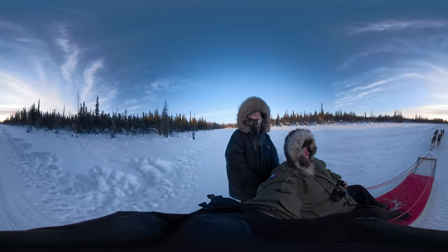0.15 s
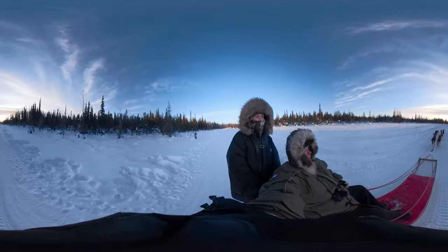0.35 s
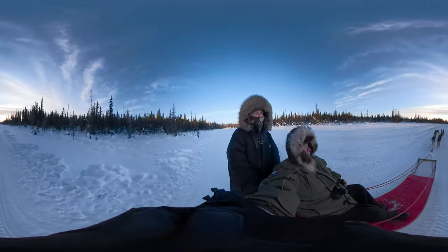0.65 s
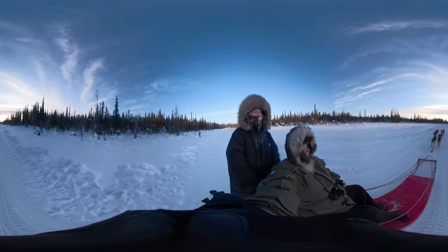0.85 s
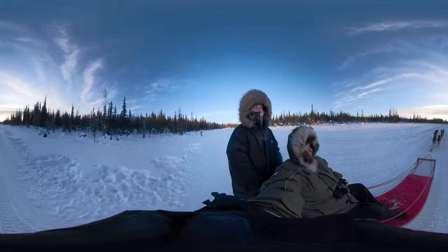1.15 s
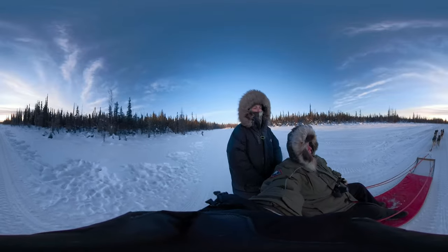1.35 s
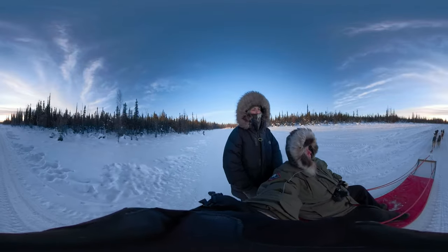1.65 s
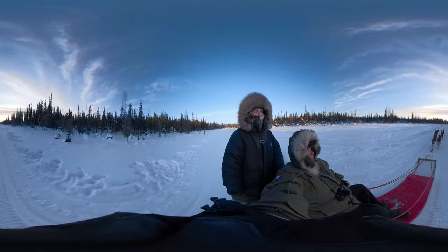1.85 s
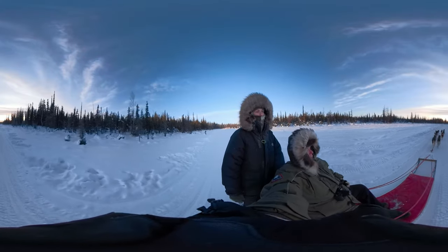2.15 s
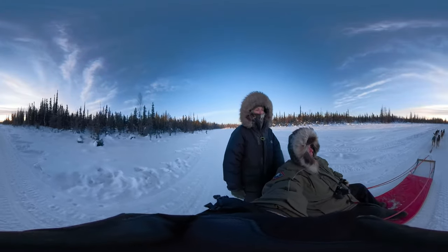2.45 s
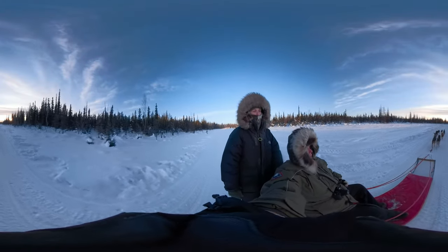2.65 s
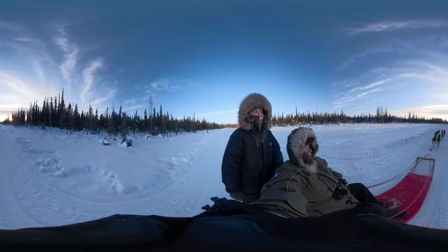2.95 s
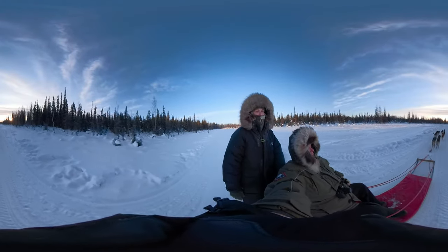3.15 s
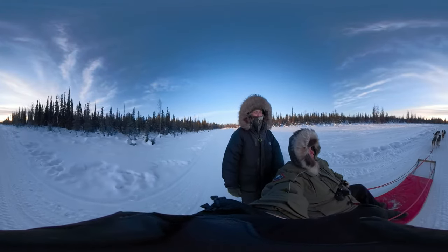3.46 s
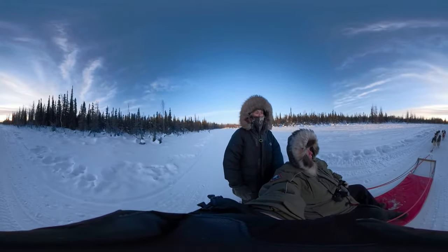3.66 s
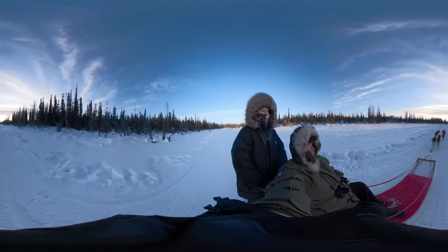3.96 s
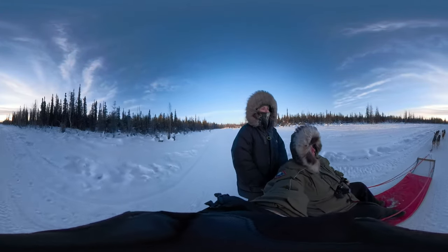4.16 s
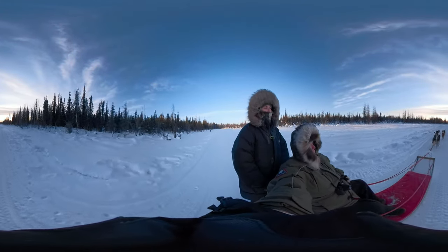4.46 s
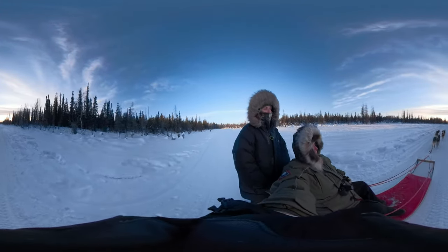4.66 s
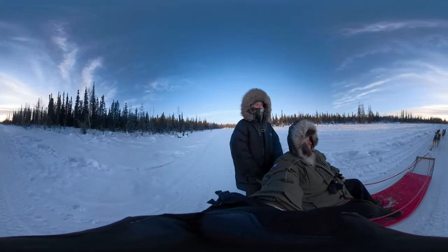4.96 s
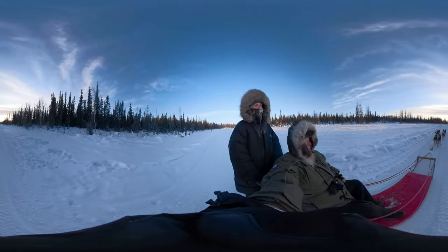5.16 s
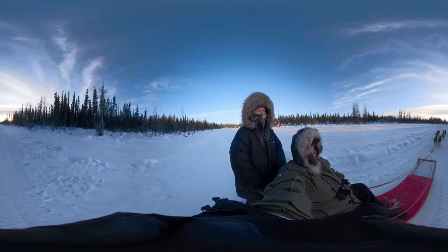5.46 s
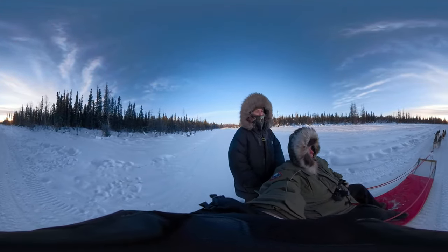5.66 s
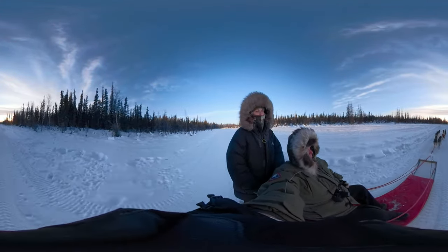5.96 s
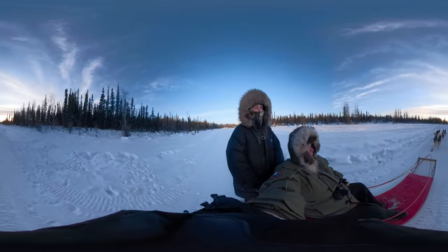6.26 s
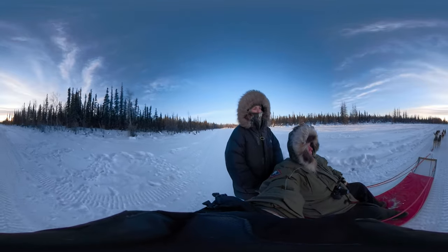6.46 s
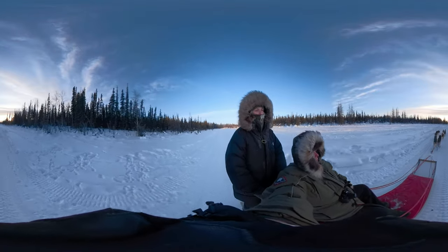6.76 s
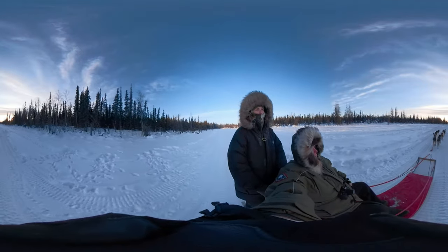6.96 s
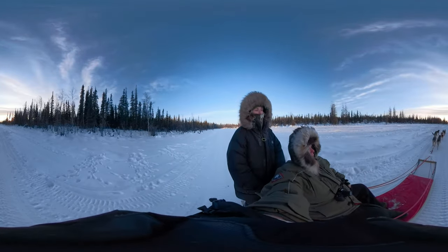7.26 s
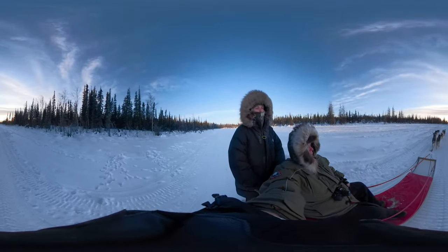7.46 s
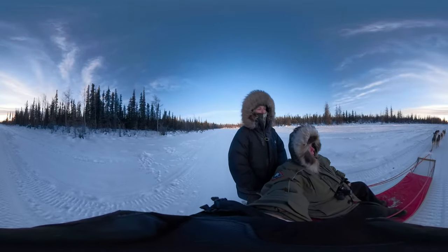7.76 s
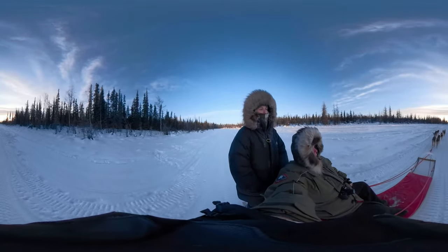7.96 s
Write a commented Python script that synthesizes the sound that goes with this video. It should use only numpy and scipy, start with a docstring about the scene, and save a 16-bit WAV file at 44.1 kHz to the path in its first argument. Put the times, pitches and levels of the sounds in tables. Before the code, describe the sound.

A wooden sled glides over packed snow with a steady low rumble and gritty scrape, jolted by dull hollow knocks, small rattles and icy ticks.

```python
"""Wooden sled on packed snow

A snowy trail, heard close up by the microphone of a small camera fixed to the sled. Uneven ground shakes
the frame's low modes; the runners hiss and crush crystals, noise carried by the wood and by the air.
Bumps slam the bed with damped sines, loose joints tick and rattle as short pings, cold snow squeaks and
powder hisses past. Resonances of the housing and its port colour the treble."""
import sys
import numpy as np
from scipy import signal
from scipy.fft import rfft, irfft, next_fast_len
from scipy.io import wavfile
from scipy.ndimage import uniform_filter1d, map_coordinates

SR = 44100
rng = np.random.default_rng(int(sys.argv[2]) if len(sys.argv) > 2 else 0)


def transcribe(signal):
    """Save signal, clipped to [-1, 1], as a 16-bit WAV file at the path in sys.argv[1]."""
    frames = np.atleast_2d(signal).T
    limited = np.clip(frames, -1, 1)
    pcm = np.round(limited * 32767).astype(np.int16)
    wavfile.write(sys.argv[1], SR, pcm)


N = 357651


def amp(db):
    """dB to gain."""
    return 10 ** (np.asarray(db) / 20)


def unit(x):
    """x at rms 1."""
    return x / np.sqrt(np.mean(x ** 2) + 1e-20)


def noise():
    """White noise over the whole ride."""
    return rng.standard_normal(N)


def wobble(rate):
    """A smooth random curve, rate knots a second."""
    knots = rng.standard_normal(int(N * rate / SR) + 4)
    return map_coordinates(knots, [np.arange(N) * rate / SR])


def curves(rows):
    """One value per sample for each column after the time."""
    s, *columns = np.transpose(rows)
    return [np.interp(np.arange(N) / SR, s, column) for column in columns]


def add(track, s, sound):
    """Mixes sound into track at s seconds."""
    part = track[max(round(s * SR), 0):][:len(sound)]
    part += sound[:len(part)]


def filtered(x, response):
    """x times a complex response of frequency."""
    m = next_fast_len(N + SR // 2)
    return irfft(rfft(x, m) * response(np.fft.rfftfreq(m, 1 / SR)), m)[..., :N]


def mode(f, hz, width):
    """Response of one causal resonance, with gain 1 at its centre hz."""
    return 1j * f * width / (hz * hz - f * f + 1j * f * width)


def coloured(x, points):
    """x through a causal filter with the (Hz, dB) shape and energy 1."""
    f, db = np.transpose(points)
    log_hz = np.log(np.fft.rfftfreq(4096, 1 / SR) + 1)
    gain = np.maximum(amp(np.interp(log_hz, np.log(f + 1), db)), 1e-5)
    # folding the cepstrum onto positive times gives minimum phase
    cepstrum = irfft(np.log(gain))
    cepstrum[1:2048] *= 2
    cepstrum[2049:] = 0
    impulse = irfft(np.exp(rfft(cepstrum)))
    return signal.fftconvolve(x, impulse / np.linalg.norm(impulse))[:N]


def crackle(rate, spread_db, t60):
    """Envelope of rms 1: random short bursts of uneven size, each dying fast (rate per s, t60 in s)."""
    chance, size = rng.random((2, N))
    starts = (chance < rate / SR) * amp(-spread_db * np.log(size + 0.0081))
    t = np.arange(SR // 20) / SR
    burst = amp(-60 * t / t60) * (1 - np.exp(-t / 0.00087))
    return unit(signal.fftconvolve(starts, burst)[:N])


def steadied(x, share):
    """Friction damps wide swings more than small ones: part of the slow level wander is taken out."""
    power = np.abs(uniform_filter1d(x * x, SR // 12))
    return unit(x / (power + 1e-3) ** (share / 2))


def ping(hz, cycles):
    """A small contact: a damped sine with a soft start, peaking after the given cycles."""
    u = np.arange(SR // 40) / SR * hz / cycles
    return u * np.exp(1 - u) * np.sin(2 * np.pi * cycles * u)


# Roughness of the trail under the sled. Each row: time in seconds, then the base levels in dB of
# bed rumble, scrape and snow hiss, which each layer offsets and varies.
RIDE = [(0.0, -26.5, -36, -51.5), (0.92, -30, -40, -57), (1.6, -27, -36.5, -53.5), (2.26, -31, -39.5, -57),
        (2.55, -27, -35.5, -53), (2.78, -22.5, -39, -54.5), (3.21, -27.5, -42.5, -60.5),
        (3.61, -26.5, -37, -52), (3.81, -32, -37, -54), (4.22, -26, -41.5, -57), (4.52, -33, -42.5, -58),
        (4.81, -28, -40, -56.5), (5.1, -34, -44.5, -61), (5.67, -26.5, -40, -54), (6.19, -28.5, -41, -55.5),
        (6.46, -32.5, -42.5, -57), (6.78, -31.5, -41, -55), (7.43, -30.5, -40.5, -56.5),
        (7.72, -35, -44, -58.5), (8.11, -26, -42.5, -58)]
# Runners' bending mode, swelling and fading with the load. Each row: time in seconds, level in dB.
FLEX = [(0.0, -29), (0.09, -26), (0.29, -36.5), (1.35, -28.5), (1.47, -44), (1.67, -23), (1.72, -31),
        (1.92, -25.5), (2.03, -39), (2.33, -28), (2.62, -34.5), (2.78, -21.5), (2.91, -36.5), (3.7, -27),
        (3.86, -38), (4.36, -28), (4.54, -46), (4.95, -28), (5.15, -39), (5.47, -28), (5.99, -31),
        (6.08, -42), (6.28, -27), (6.37, -38.5), (8.09, -34.5), (8.11, -42)]
# Pitch of that bending, before its random drift. Each row: time in seconds, pitch in Hz.
FLEX_PITCH = [(0, 65), (1.2, 67), (2, 66.5), (2.35, 71), (2.7, 68), (3.7, 69), (4.6, 71), (8.11, 71)]
# Low modes of the bed. Each row: centre in Hz, width in Hz, relative level in dB.
BED_MODES = [(94.3, 41.6, -7), (139.9, 31.9, 0.5), (165.2, 38.6, -1.5), (200.9, 50.5, -7.5),
             (260.8, 32, -12), (347, 88, -29)]


def frame():
    """The uneven trail drives the runners' bending, the bed's low modes and a heave of the whole sled."""
    bed_db = curves(RIDE)[0]
    (hz,), (flex_db,) = curves(FLEX_PITCH), curves(FLEX)
    phase = 2 * np.pi * np.cumsum(hz + 1.68 * wobble(9.1)) / SR
    flex = unit(amp(1.9 * wobble(8) + 1.5 * wobble(13)) * np.sin(phase))

    def bed_response(f):
        """The modes in parallel with alternating signs, through one broad resonance."""
        modes = sum((-1) ** k * amp(db) * mode(f, centre, width)
                    for k, (centre, width, db) in enumerate(BED_MODES))
        return modes * mode(f, 149, 390)

    bed = steadied(unit(filtered(noise(), bed_response)), share=0.23)
    lumps = unit(amp(1.64 * wobble(6) + 0.54 * wobble(16)) * bed)
    heave = unit(filtered(noise(), lambda f: mode(f, 38, 47) ** 2))  # the whole sled on the snow
    heave_db = 0.57 * bed_db - 20.5 + 2.5 * wobble(9.8)
    return amp(flex_db) * flex + amp(bed_db + 3.0) * lumps + amp(heave_db) * heave


# Fine powder thrown past the camera. Each row: time in seconds, level in dB before the flicker.
SPRAY = [(0.0, -68), (0.34, -73.5), (0.99, -76), (1.4, -72), (2.21, -74.5), (2.66, -69.5), (3.18, -74.5),
         (3.57, -69.5), (5.28, -78), (5.47, -74), (6.14, -72), (6.57, -77), (6.82, -69.5), (7.52, -72),
         (7.68, -75), (8.11, -77)]


def spray(flicker):
    """Powder hiss excites the port's top resonance."""
    level = amp(curves(SPRAY)[0]) * flicker
    return level * unit(filtered(noise(), lambda f: mode(f, 12040, 2500) ** 2))


# Scrape carried to the microphone by the frame. Each row: frequency in Hz, relative density in dB per Hz.
WOOD = [(180, -27), (300, 2.5), (399, -6), (463, -4.5), (569, -10.5), (792, -12), (908, -15), (1390, -13),
        (2240, -22.5), (4150, -31), (4600, -35), (5980, -51.5), (10100, -120)]
# Hiss through the microphone port. Each row: frequency in Hz, relative density in dB per Hz.
HOUSING = [(2470, -33), (4200, -12.5), (4530, -6), (5370, 4.5), (5690, 3.5), (7270, 0), (8950, -24),
           (9960, -23), (12100, -18.5), (14200, -24.5), (15000, -31)]
# Scuffs, a runner skids over crust. Each row: start in seconds, hiss level in dB, scrape level in dB,
# length in seconds.
SCUFFS = [(0.0, -57, -44, 0.025), (1.944, -58.5, -50, 0.07), (2.536, -56, -42, .05),
          (2.69, -52.5, -41, .04), (3.223, -47.5, -47, .045), (4.335, -59, -46.5, 0.07),
          (4.776, -61, -42, 0.069), (5.55, -58.5, -53, 0.042), (6.753, -54, -45, 0.046)]
CRUNCH_T60_S, CRUNCH_AIR_DB = 0.2, -12.5  # the crunch dies away; its airborne share
TICK_RISE_S, CREST_DB = 0.0013, 9.5  # rise of a tick; peak of its noise over the rms
JAR_DB, JAR_T60_S = -9.5, 0.039  # the jolt that a rattle passes to the runners, relative to the rattle


def contact():
    """White excitation at the runners: one share travels through the wood, one through the air."""
    _, scrape_db, hiss_db = curves(RIDE)
    grit = crackle(rate=120, spread_db=-2.5, t60=0.0093)  # crystals breaking, common to both paths
    surge = wobble(11)
    wood_grain = unit(1 + 0.26 * grit + 0.33 * crackle(rate=60, spread_db=4, t60=0.023))
    air_grain = unit(1 + 0.39 * grit + 0.36 * crackle(rate=110, spread_db=7, t60=0.022))
    wood = amp(scrape_db + 1.3 * surge - 1.9) * wood_grain
    air = amp(hiss_db + 1.64 * surge + 0.17) * air_grain
    ragged = unit(1 + 0.44 * crackle(rate=63, spread_db=6.5, t60=0.02))
    t = np.arange(SR // 4) / SR
    for s, *_, crunch_db in BUMPS:  # the crust gives way in bits under the slam
        puff = amp(crunch_db - 60 * t / CRUNCH_T60_S) * (1 - np.exp(-t / 0.0053))
        puff = puff * np.resize(ragged[round(s * SR):], len(t))
        add(wood, s - 0.004, puff)
        add(air, s - 0.004, amp(CRUNCH_AIR_DB) * puff)
    for s, scuff_hiss_db, scuff_scrape_db, length in SCUFFS:
        skid = np.sin(np.pi * np.clip(t / length, 0, 1))
        skid = skid * np.resize(ragged[round(s * SR):], len(t))
        add(air, s, amp(scuff_hiss_db) * skid)
        add(wood, s, amp(scuff_scrape_db) * skid)
    u = t / TICK_RISE_S
    for s, treble_db, *_ in TICKS:
        add(air, s, amp(treble_db - CREST_DB) * u * np.exp(1 - u))
    for s, db, _ in RATTLES:  # each rattle also jars the runners on the snow
        add(wood, s, amp(db + JAR_DB - 60 * t / JAR_T60_S))
    powder = spray(amp(3.2 * surge) * unit(1 + 0.74 * grit))
    return powder + coloured(wood * noise(), WOOD) + coloured(air * noise(), HOUSING)


# Slats and joints rattling. Each row: start in seconds, level in dB, ring in Hz.
RATTLES = [(0.176, -30, 1430), (0.295, -39, 1220), (0.427, -33, 1420), (0.479, -28.5, 1270),
           (1.3647, -32, 1260), (1.3827, -38, 1200), (1.4402, -35, 1310), (1.6495, -30, 1010),
           (1.7464, -35, 1700), (1.8998, -29.5, 1540), (2.077, -29.5, 1330), (2.5467, -28, 1270),
           (2.5674, -27, 1520), (2.6914, -26.5, 1420), (2.7829, -30.5, 1420), (2.8393, -36, 950),
           (2.8785, -27, 1430), (3.038, -28, 1364), (3.0956, -36, 1700), (3.1124, -27.5, 1420),
           (3.255, -31.5, 1270), (3.647, -35, 1440), (4.0487, -40, 1362), (4.1633, -33, 1680),
           (4.2762, -38, 1310), (4.3356, -29, 950), (4.359, -27, 1220), (4.377, -33, 1070),
           (4.3997, -31, 1140), (4.4807, -35, 1170), (4.6059, -33, 1260), (4.685, -33, 1080),
           (4.7147, -28, 1330), (4.796, -25, 1470), (4.8761, -27.5, 1310), (4.961, -40, 1440),
           (5.004, -34, 1050), (5.1614, -29.5, 1140), (5.2297, -32.5, 1570), (5.3045, -33.5, 1780),
           (5.8381, -34, 1340), (5.9418, -29, 980), (6.052, -31, 1117), (6.062, -29, 1230),
           (6.293, -34, 1080), (6.608, -33, 1210), (6.709, -29.5, 1290), (6.763, -30, 1500),
           (6.811, -36, 1540), (6.874, -43, 1500), (7.2284, -37.5, 1540), (7.2865, -38, 988),
           (7.314, -28.5, 1850), (7.4516, -35, 988), (7.537, -33, 1720), (7.583, -34, 1150),
           (7.6579, -34.5, 1080), (7.842, -37.5, 1500), (7.8773, -41, 1560), (7.9028, -38, 1580),
           (7.9457, -34, 1410), (8.042, -36, 1160)]
# Brittle ticks of ice crust and fittings. Each row: start in seconds, treble noise peak in dB,
# body level in dB, snap level in dB.
TICKS = [(0.4063, -42, -41, -70), (0.4403, -40, -49, -65), (0.4787, -33, -47, -57), (0.507, -25, -52, -51),
         (0.7022, -41, -54, -69), (0.7343, -36, -49, -69), (0.7475, -30.5, -46, -65),
         (1.2162, -40.5, -53, -63), (1.648, -33, -35, -60), (2.0846, -37, -51, -68),
         (2.2554, -36, -47, -61), (2.28, -37.5, -48, -61), (2.8773, -35.5, -54, -65),
         (3.047, -34.5, -47, -64), (3.066, -38, -39, -65), (3.093, -39, -41, -61), (3.1102, -34, -38, -63),
         (3.3003, -45, -52, -69), (3.3788, -36, -44, -65), (3.515, -38, -54, -57), (3.654, -39, -50, -55),
         (4.0197, -38, -48, -65), (4.0321, -37, -52, -61), (4.0459, -32.5, -39, -58),
         (4.0662, -25.5, -39, -52), (4.0818, -27.5, -43, -57), (4.4159, -38, -53, -64),
         (4.519, -39, -53, -72), (4.6496, -34.5, -41, -65), (4.6851, -39, -42, -61),
         (4.7146, -33, -34, -58), (4.7335, -29.5, -41, -56), (4.7945, -32.5, -36, -63),
         (5.16, -33.5, -37, -48), (5.942, -38, -44, -63), (6.025, -41, -53, -62), (6.0453, -36, -42, -60),
         (6.06, -29, -38, -53), (6.095, -22.5, -42, -48), (6.2027, -35, -40, -66), (6.488, -38, -52, -71),
         (6.6378, -32, -37, -60), (6.7072, -24.5, -33, -36), (7.314, -37.5, -52, -65),
         (7.842, -37, -53, -52), (7.9456, -41, -41, -74)]
# Short squeaks of cold snow. Each row: start in seconds, level in dB, pitch in Hz, cycles to the peak.
SQUEAKS = [(0.304, -43, 1250, 4.3), (.405, -44, 4850, 12), (.408, -48, 3850, 7), (.427, -45, 2980, 9),
           (.427, -40, 1390, 5.8), (.439, -43, 5180, 14), (.456, -48, 4660, 10)]


def joints():
    """Rattles, ticks and squeaks ring briefly; many random pings follow the roughness of the trail."""
    out = np.zeros(N)
    for s, db, hz in RATTLES:
        lower = ping(hz * rng.uniform(0.47, 0.6), cycles=0.37)
        add(out, s, amp(db) * (ping(hz, cycles=0.75) + 0.7 * lower))
    for s, _, body_db, snap_db in TICKS:
        add(out, s, amp(body_db) * ping(rng.uniform(2500, 3900), cycles=1.4))
        add(out, s, amp(snap_db) * ping(rng.uniform(11000, 13500), cycles=3.5))
    for s, db, hz, cycles in SQUEAKS:
        add(out, s, amp(db) * ping(hz, cycles))
    scrape_db = curves(RIDE)[1]
    for when, pitch, life, size in rng.random((2600, 4)):
        hz = 500 * (2300 / 500) ** pitch
        grain = ping(hz, cycles=0.65 + 4.0 * life ** 5)  # most crack, a few squeak
        grain_db = scrape_db[int(when * N)] - 10.0 - 2.05 * np.log(size + 0.025)
        add(out, when * N / SR, amp(grain_db) * grain)
    return out


# Bumps under the bed. Each row: time in seconds, slam level in dB, slam pitch in Hz,
# swing time in milliseconds, sway level in dB, crunch level in dB.
BUMPS = [(0.151, -16.5, 181, 5.7, -51, -53), (0.485, -5.5, 124, 7.5, -19, -34),
         (1.65, -8, 117, 8.1, -26, -42), (2.074, -16, 129, 7, -28, -54), (2.283, -13, 84.5, 9.8, -20, -32),
         (2.62, -9, 113.4, 19, -36, -65), (2.743, -9.5, 185, 11.6, -35, -66),
         (2.881, -10.5, 146.5, 8.9, -49, -55), (2.97, -13, 175, 8, -45, -68),
         (3.381, -14, 119, 7.5, -22, -50), (3.523, -16, 129, 8.6, -42, -56),
         (3.834, -13.5, 165, 9.4, -30, -59), (4.049, -1.5, 129.7, 7.1, -32, -27),
         (4.434, -14.5, 143.3, 18.5, -44, -40), (4.718, -3.5, 118, 11, -35, -27.5),
         (5.327, -14, 130.5, 7.8, -28, -49), (6.064, -3, 127.6, 9.1, -37, -25.5),
         (6.184, -10, 117.4, 7.6, -51, -65), (6.71, -5, 109, 9.8, -26, -30.5),
         (7.315, -2, 125, 8.1, -29, -30.5), (7.829, -13, 142.3, 8.4, -24, -44)]
# Bed overtones, before a random spread. Each row: pitch in Hz, level in dB relative to the slam,
# 60 dB decay in seconds.
SLATS = [(199.5, -9, 0.11), (273.6, -18.5, 0.14), (365.6, -20.5, 0.095), (590, -36.5, 0.084),
         (870, -37, 0.036)]


def bumps():
    """A soft blow: the bed swings up and is damped by its load, slats ring and the whole sled sways."""
    out, t = np.zeros(N), np.arange(SR // 4) / SR
    for s, db, hz, swing_ms, sway_db, _ in BUMPS:
        u = 1000 * t / swing_ms
        slam = np.tanh(u) * np.exp(-u ** 3 / 20) * np.sin(2 * np.pi * hz * t)
        slats = np.zeros(len(t))
        for slat_hz, level_db, t60 in SLATS:
            decay = amp(level_db + rng.normal(0, 1.2) - 60 * t / t60)
            slats += decay * np.sin(2 * np.pi * slat_hz * rng.normal(1, 0.024) * t)
        v = t / 0.032
        sway = v * np.exp(1 - v) * np.sin(2 * np.pi * 36 * t)
        blow = slam + slats * (1 - np.exp(-t / 0.014))
        add(out, s - 0.002, amp(db) * blow + amp(sway_db) * sway)
    return out


def scene():
    """Everything reaches one microphone."""
    return (frame() + contact() + joints() + bumps())[None]


TOP_HZ = 15250  # band limit


def record(dry):
    """The camera rolls off the lowest bass below 25 Hz and keeps nothing above its band limit."""
    return filtered(dry, lambda hz: (hz < TOP_HZ) * 1j * hz / (25 + 1j * hz))


dry = scene()
out = record(dry)
transcribe(out)
```